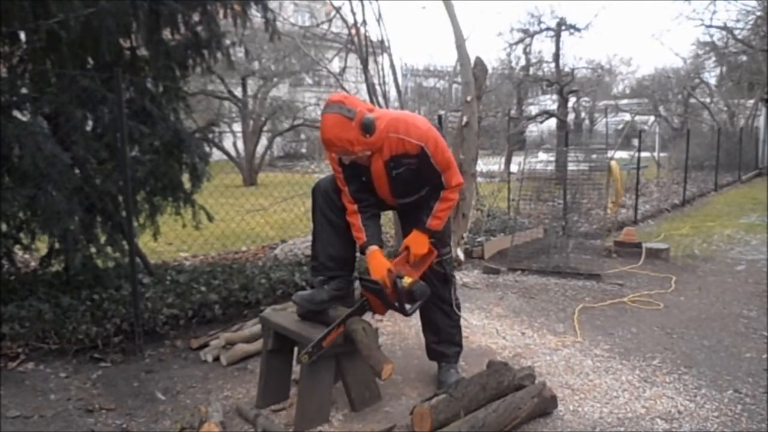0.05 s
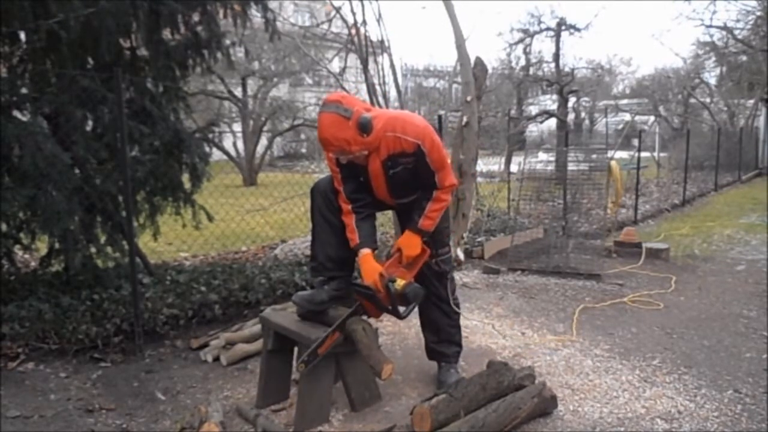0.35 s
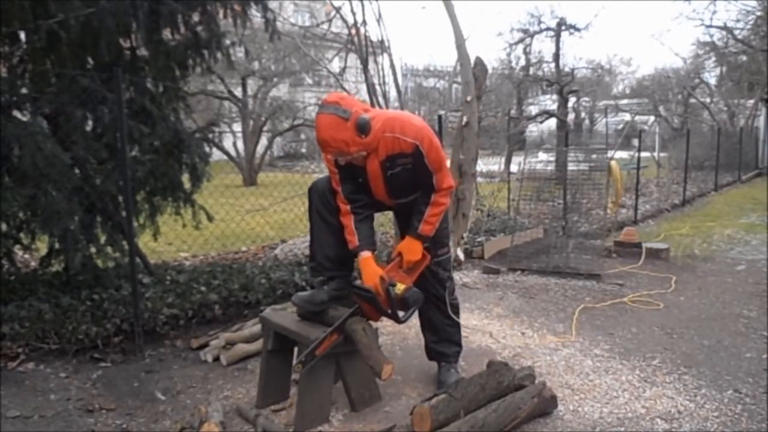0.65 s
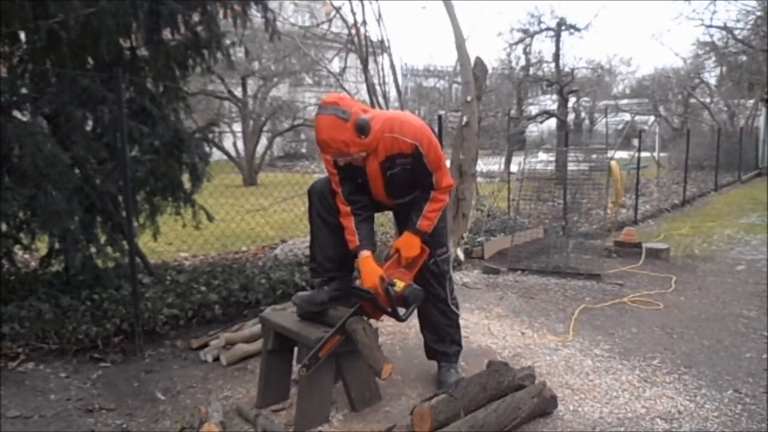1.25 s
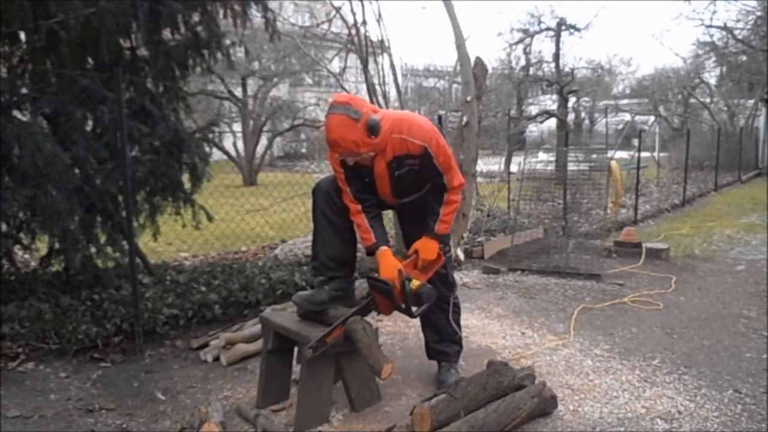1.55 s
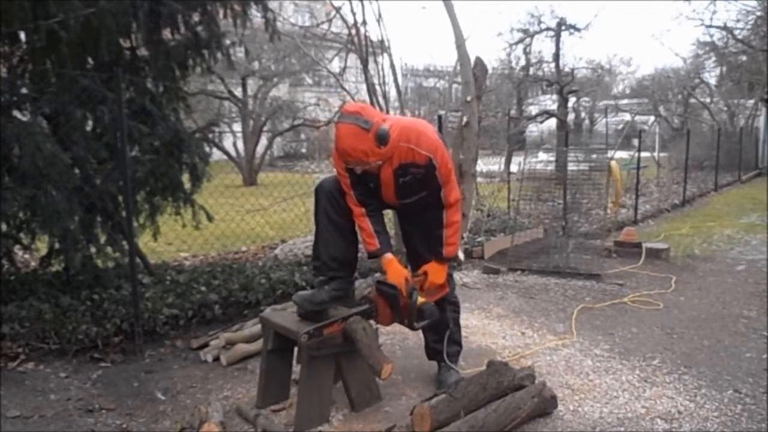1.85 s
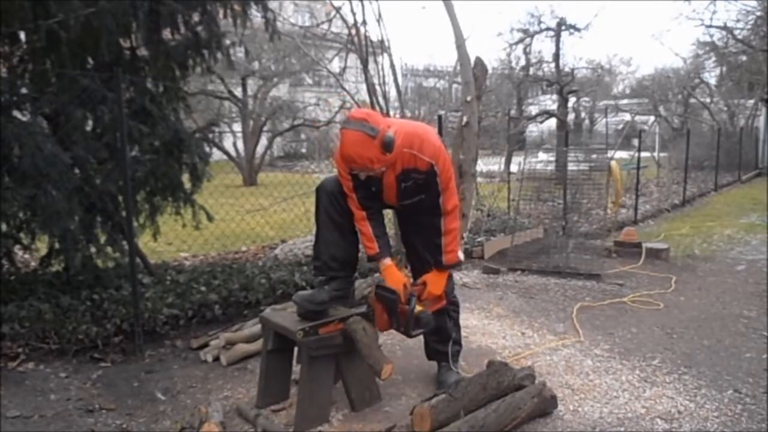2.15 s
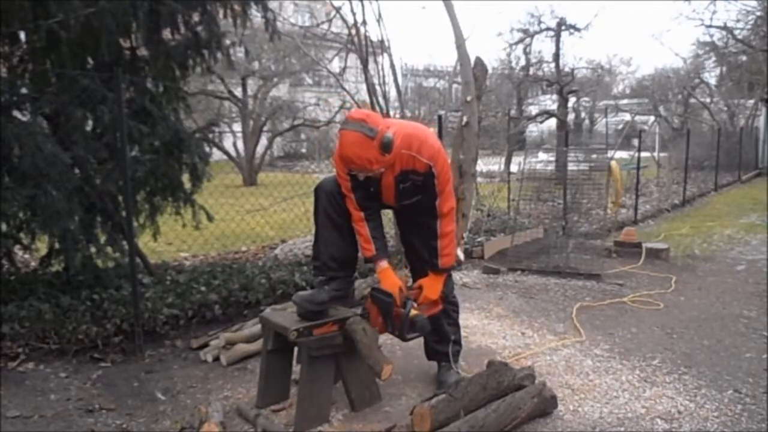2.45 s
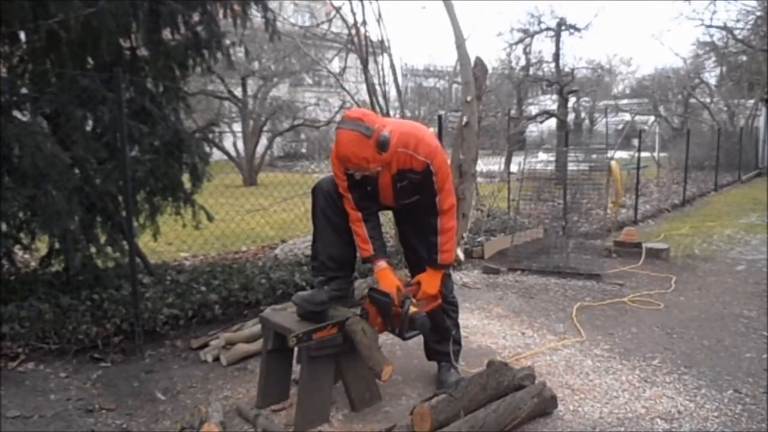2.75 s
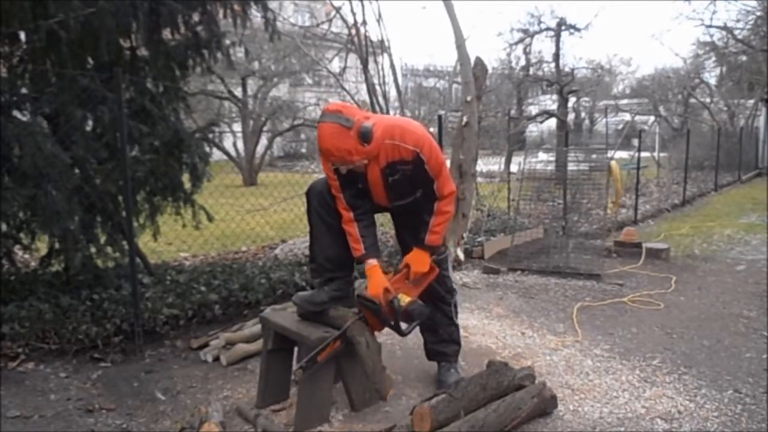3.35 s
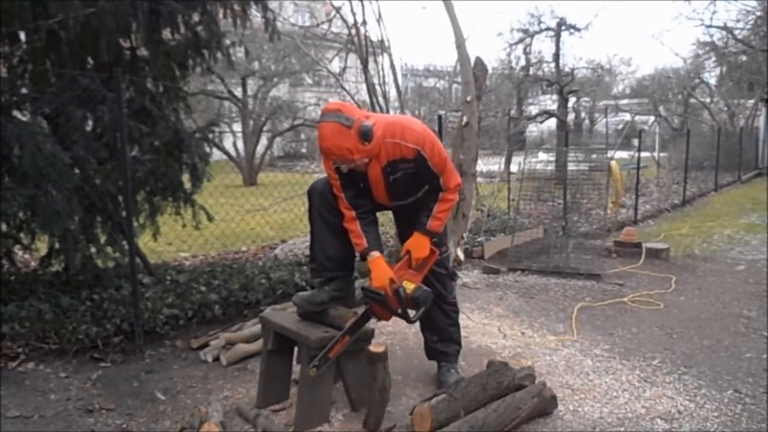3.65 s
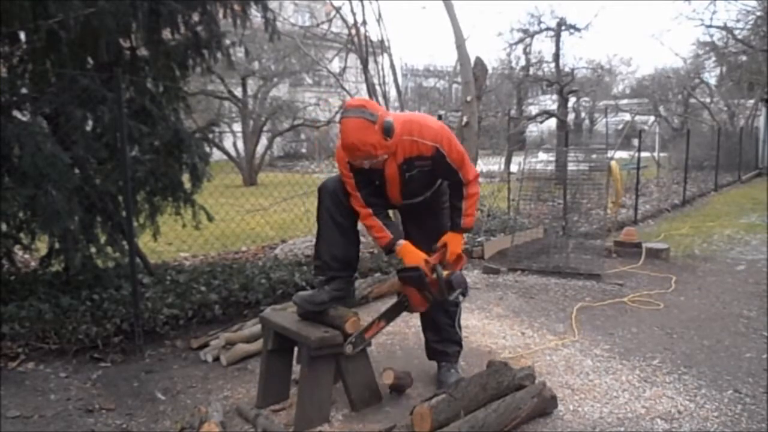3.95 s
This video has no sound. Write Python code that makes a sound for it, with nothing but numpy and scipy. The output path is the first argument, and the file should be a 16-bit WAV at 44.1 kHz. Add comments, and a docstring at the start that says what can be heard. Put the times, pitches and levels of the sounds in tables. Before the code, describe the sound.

Close to a slightly distorting mono microphone, an electric chainsaw runs steadily outdoors. The chain hisses, the motor's shrill whine wavers under load, and the log rasps and rings with each bite, dropping in pitch near the end.

```python
"""Electric chainsaw cutting a log

The saw works in a yard, close to an overloaded mono microphone. The motor's fan whines
near 6 kHz and sags under load. The chain hisses round the bar, and its teeth make
the log ring near 1 kHz each time they bite."""
import sys
import numpy as np
from scipy import signal
from scipy.fft import rfft, irfft
from scipy.io import wavfile
from scipy.ndimage import uniform_filter1d

SR = 44100
rng = np.random.default_rng(int(sys.argv[2]) if len(sys.argv) > 2 else 0)


def to_wav(sig):
    """Store sig (one row per channel, or 1-D mono) as 16-bit WAV at the path in sys.argv[1].

    Samples outside -1..1 are clipped; the rate is SR.
    """
    pcm = np.clip(np.atleast_2d(sig), -1, 1) * 32767
    pcm = np.round(pcm).astype(np.int16)
    wavfile.write(sys.argv[1], SR, pcm.T)  # frames by channels


N = 176400
T = np.arange(N) / SR


def amp(db):
    """Turns decibels into a gain."""
    return 10 ** (np.asarray(db) / 20)


def unit(x):
    """Scales x to an average (rms) size of 1."""
    return x / np.sqrt(np.mean(x ** 2) + 1e-20)


def curve(points):
    """Joins (time, value) rows with straight lines."""
    return np.interp(T, *np.transpose(points))


def wander(rate_hz):
    """A smooth random drift of size 1."""
    f = np.fft.rfftfreq(N, 1 / SR)
    return unit(irfft(rfft(rng.standard_normal(N)) / (1 + (f / rate_hz) ** 2), N))


def colour(x, spectrum):
    """Shapes the lows and highs of x, at size 1."""
    hz, db = np.transpose(spectrum)
    f = np.fft.rfftfreq(N, 1 / SR)
    return unit(irfft(rfft(x) * amp(np.interp(np.log(f + 1), np.log(hz), db)), N))


def resonate(x, hz, width_hz):
    """Lets x ring at the moving pitch hz, at size 1."""
    turn = np.exp(2j * np.pi * np.cumsum(hz) / SR)
    decay = np.exp(-np.pi * width_hz / SR)
    return unit((turn * signal.lfilter([1 - decay], [1, -decay], x / turn)).real)


def noise(spectrum, level_db, flicker_db):
    """Shaped noise whose level flickers."""
    return colour(rng.standard_normal(N), spectrum) * amp(level_db + flicker_db * wander(rate_hz=18))


# Tone colour of the rumble: f/Hz, level/dB
RUMBLE_COLOUR = [(20, 2), (60, -1), (120, -5), (250, -16), (1000, -45)]

def rumble(whine_db):
    """A low rumble swells with the whine."""
    return noise(RUMBLE_COLOUR, -37.5 + 1.7 * whine_db, flicker_db=3)


# Tone colour of the fan's air: f/Hz, level/dB
AIR_COLOUR = [(20, -36), (3500, -25), (5300, -5), (6300, -0.5), (6900, -1), (7600, -6.5), (9200, -3.5),
              (10500, -12), (16000, -27)]
# Rise and fall of the air, widened below: t/s, level/dB
AIR_SWELL = [(0.0, -16.5), (0.47, -16.5), (0.58, -14.5), (0.82, -22.5), (1.2, -15.5), (1.31, -21),
             (1.84, -16.5), (1.99, -19), (2.28, -15), (2.67, -19), (3.5, -15.5), (3.68, -23.5), (3.8, -15),
             (4.0, -21.5)]

def fan_air():
    """Air rushes through the fan and hisses around the whine."""
    swell = curve(AIR_SWELL)
    return noise(AIR_COLOUR, -15.5 + 1.5 * (swell - swell.mean()), flicker_db=.6)


# Tone colour of the fizz: f/Hz, level/dB
FIZZ_COLOUR = [(20, -47), (7000, -21), (10500, 2.5), (12800, 2.5), (16000, -0.5)]
# Rise and fall of the fizz, widened below: t/s, level/dB
FIZZ_SWELL = [(0.0, -21), (0.49, -21), (0.65, -21), (0.81, -19), (1.18, -22), (1.41, -20), (1.68, -19),
              (1.79, -22), (1.93, -18.5), (2.25, -20), (2.78, -18.5), (3.32, -22), (3.69, -19), (3.78, -25),
              (3.98, -22), (4.0, -31)]

def high_fizz():
    """A very high fizz comes and goes, mostly swelling with the whine."""
    swell = curve(FIZZ_SWELL)
    return noise(FIZZ_COLOUR, -17 + 3.3 * (swell - swell.mean()), flicker_db=1.2)


# Tone colour of the running chain: f/Hz, level/dB
CHAIN_COLOUR = [(20, -3.5), (100, -2), (300, -1.05), (700, -1.1), (1800, -0.84), (2600, 0), (4000, -1),
                (5500, 0.5), (9000, -3), (11000, -9), (16000, -8)]

def chain_hiss(whine_db):
    """The chain hisses round the bar, a little louder when the whine is strong."""
    return noise(CHAIN_COLOUR, -10 + .26 * whine_db, flicker_db=.16)


# Pitch of the fan's whine: t/s, f/Hz
FAN_PITCH = [(0.0, 5865), (0.21, 6134), (0.64, 6068), (0.78, 6290), (0.85, 6310), (0.96, 6166),
             (1.13, 5841), (1.18, 5774), (1.24, 5884), (1.32, 6100), (1.6, 6361), (2.11, 6203),
             (2.32, 6070), (2.61, 6144), (2.82, 6345), (3.24, 5847), (3.34, 5840), (3.55, 6138),
             (3.78, 6610), (3.81, 6495), (3.97, 5955), (4.0, 5900)]

def fan_pitch():
    """Blades passing per second: the rate sags as the motor slows under load."""
    return uniform_filter1d(curve(FAN_PITCH), size=3000, mode="nearest")


# Strength of the whine, before its boost: t/s, level/dB
WHINE_LEVEL = [(0, -18), (.03, -15.5), (.14, -19), (.25, -18), (.5, -13), (.59, -24), (.69, -12),
               (.85, -10), (1.01, -13), (1.11, -22), (1.25, -22), (1.32, -12), (1.65, -12), (1.74, -12.5),
               (1.79, -19.5), (1.9, -10.5), (2.32, -13.5), (2.73, -9.5), (2.95, -10.5), (3.07, -12.5),
               (3.26, -21), (3.41, -14), (3.52, -19), (3.61, -10.5), (3.73, -12.5), (3.78, -23),
               (3.9, -16.5), (3.95, -19), (3.97, -16), (4, -11)]
# How much the saw judders in the cut: t/s, amount/0-1
SAW_JUDDER = [(0, 0.26), (.2, 0.97), (.55, 0.83), (.72, 0.07), (3.7, .1), (3.8, .9), (4, 0.9)]
# Tones of the motor shaft: multiple of its turning rate, level/dB
SHAFT_TONES = [(1, -43), (2, -31.5), (14, -34), (16, -28)]
BLADES, RIPPLE_HZ, SIDE_GAP_HZ = 15, 100, 3898

def motor(blade_hz):
    """The fan whines over weak shaft tones; judder shakes the pitch and the whine's level."""
    judder = curve(SAW_JUDDER)
    jitter_hz = 30 * judder * wander(rate_hz=57)
    phase = 2 * np.pi * np.cumsum(blade_hz + jitter_hz) / SR
    level_db = curve(WHINE_LEVEL)
    boost_db = 2.6 + .3 * np.maximum(level_db + 16.5, 0)
    flutter_db = (.75 + 2.4 * judder) * wander(rate_hz=64)
    mains_ripple = 1 + .04 * np.sin(2 * np.pi * RIPPLE_HZ * T)
    gain = amp(level_db + boost_db + flutter_db) * mains_ripple
    # Bending the wave adds a faint tone on each side of the whine, and its octave.
    side_bend = .19 * np.sin(2 * np.pi * SIDE_GAP_HZ * T)
    octave_bend = .56 * gain * np.sin(phase)
    whine = np.sin(phase + side_bend + octave_bend)
    upper_side = amp(-24) * resonate(rng.standard_normal(N), blade_hz + SIDE_GAP_HZ, width_hz=90)
    shaft = sum(amp(db) * np.sin(k * phase / BLADES + 2 * np.pi * rng.random())
                for k, db in SHAFT_TONES)
    return np.sqrt(2) * (gain * (whine + upper_side) + shaft)


# Tones of the passing teeth: multiple of the tooth rate, relative level/dB
TOOTH_HUM = [(4, -27), (5, -27), (6, -24)]
TEETH_PER_TURN, TOOTH_SCATTER_DB = .49, 2

def teeth(blade_hz):
    """Each tooth strikes with its own strength, then scrapes; their fast beat makes a hum."""
    tooth_hz = blade_hz / BLADES * TEETH_PER_TURN * (1 + .008 * wander(rate_hz=60))
    passed = np.cumsum(tooth_hz) / SR
    strength = amp(TOOTH_SCATTER_DB * rng.standard_normal(4096))
    scrape, strike = .67, .71 * np.exp(-(passed % 1) / .3)
    force = unit(strength[passed.astype(int) % len(strength)] * (scrape + strike))
    hum = sum(amp(db + 3.5 * wander(rate_hz=14)) * np.sin(2 * np.pi * (k * passed + rng.random()))
              for k, db in TOOTH_HUM)
    return force, hum


# How hard the teeth bite: t/s, relative level/dB
BITE_LEVEL = [(0.0, -19.5), (0.11, -19.5), (0.12, -16.5), (0.47, -16.5), (0.65, -15.5), (0.75, -22.5),
              (0.9, -23), (1.05, -15.5), (1.27, -17), (1.32, -24), (1.34, -12.5), (1.38, -20.5),
              (1.47, -21), (1.53, -14), (1.55, -25), (1.6, -21), (1.63, -24.5), (1.77, -15.5), (1.92, -21),
              (2.27, -16.5), (2.31, -10.5), (2.34, -17), (2.77, -22), (2.85, -16.5), (2.9, -24),
              (2.95, -13), (3.0, -22), (3.02, -11.5), (3.03, -20), (3.24, -14), (3.31, -17.5), (3.6, -17.5),
              (3.62, -23), (3.77, -19), (3.99, -25.5), (4.0, -16)]
# Notes at which the log and bar ring: f/Hz, width/Hz, relative level/dB
LOG_NOTES = [(976, 73, 0.5), (1020, 230, -3), (1170, 78, -14), (872, 110, -12), (613, 78, -14.5),
             (306, 46, -16.5)]
# The notes drop as the cut nears its end: t/s, pitch/ratio
LOG_PITCH = [(0, 1.003), (3.5, 1.004), (3.8, 0.924), (4, 0.87)]
# Tone colour of tearing wood fibres: f/Hz, level/dB
RASP_COLOUR = [(20, -33), (300, -14.5), (480, -9.5), (600, -4), (760, -5.5), (1080, -1.5), (1500, -2),
               (1850, -15), (2800, -10.5), (5000, -22), (16000, -45)]

def log_cut(force, hum, whine_db):
    """The teeth ring the log; fibres rasp most when the bite is deep and the whine is weak."""
    bite_db = curve(BITE_LEVEL) + 15.5
    tuning = curve(LOG_PITCH)
    ring = sum(amp(db) * resonate(force * rng.standard_normal(N), hz * tuning, width)
               for hz, width, db in LOG_NOTES)
    ring = colour(ring, [(20, -14), (280, -3.5), (600, -2), (1400, -1.5), (2000, -2.5), (8000, -18)])
    rasp = colour(force * rng.standard_normal(N), RASP_COLOUR)
    rasp_db = -16.5 + 1.1 * bite_db - .28 * whine_db
    return amp(.97 * bite_db) * (amp(-13.5) * ring + hum) + amp(rasp_db) * rasp


def scene():
    """Chain, motor and cut at one spot, the same in both channels."""
    blade_hz = fan_pitch()
    level_db = curve(WHINE_LEVEL)
    whine_db = np.maximum(level_db - level_db.mean(), -7)  # above or below its average
    saw = chain_hiss(whine_db) + fan_air() + high_fizz() + rumble(whine_db) + motor(blade_hz)
    force, hum = teeth(blade_hz)
    saw += log_cut(force, hum, whine_db)
    return np.array([saw, saw])


CLIP_LEVEL, CLIP_BIAS, CLIP_HARDNESS, TOP_HZ = .62, .11, 4, 15730

def record(dry):
    """The overloaded microphone squashes peaks a little lopsidedly; the highest treble is cut."""
    x = signal.resample_poly(dry, 2, 1, axis=1) / CLIP_LEVEL  # double rate limits false tones
    ceiling = 1 + CLIP_BIAS * np.sign(x)
    x = x / (1 + abs(x / ceiling) ** CLIP_HARDNESS) ** (1 / CLIP_HARDNESS)
    x = amp(.1) * CLIP_LEVEL * signal.resample_poly(x, 1, 2, axis=1)
    treble_cut = signal.firwin(801, TOP_HZ, window=("kaiser", 7), fs=SR)
    return signal.oaconvolve(x, treble_cut[None], "same")


dry = scene()
out = record(dry)
to_wav(out)
```